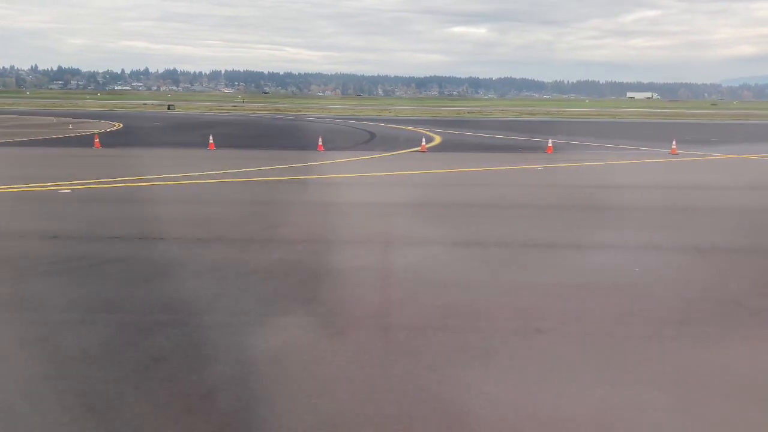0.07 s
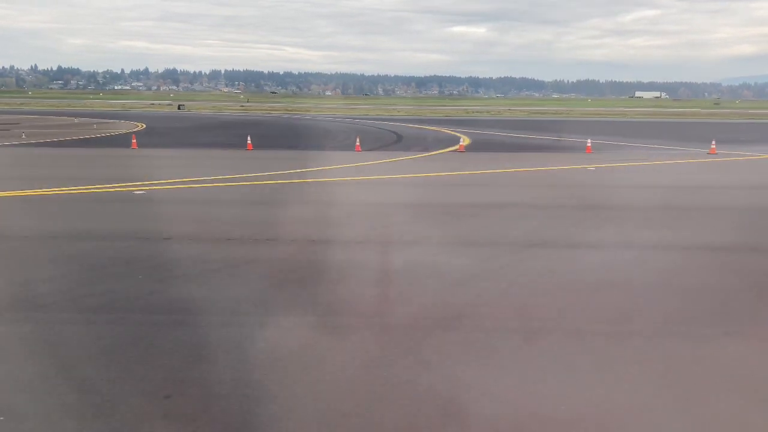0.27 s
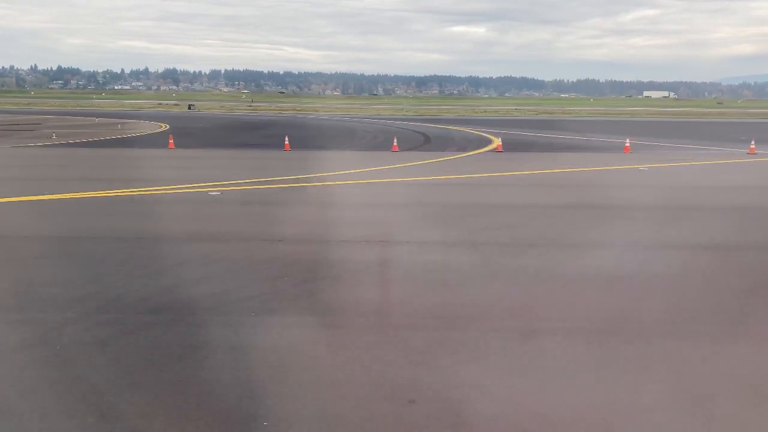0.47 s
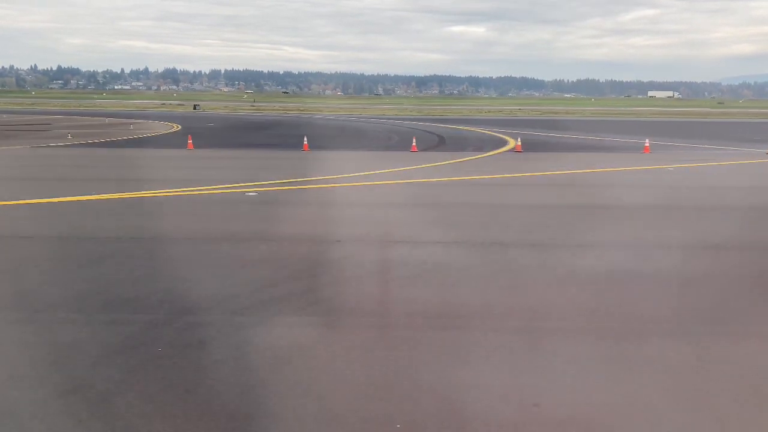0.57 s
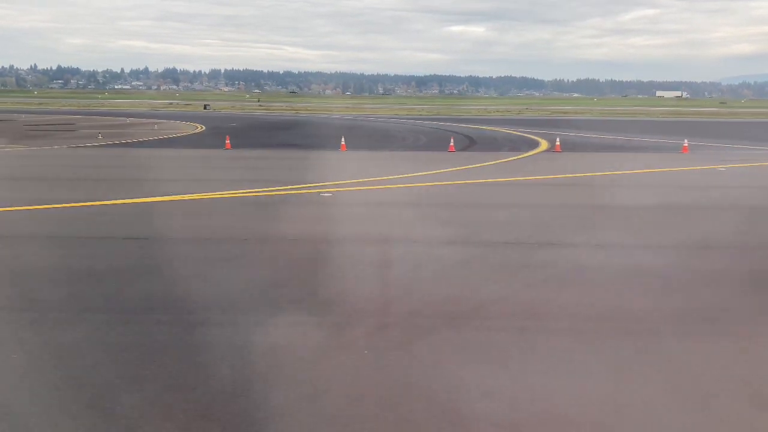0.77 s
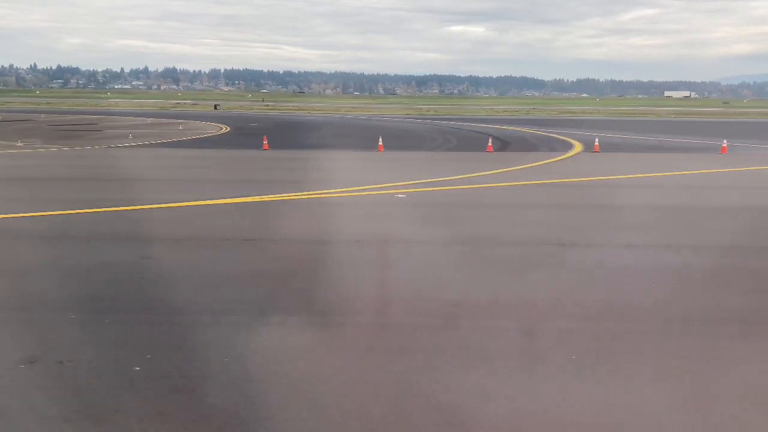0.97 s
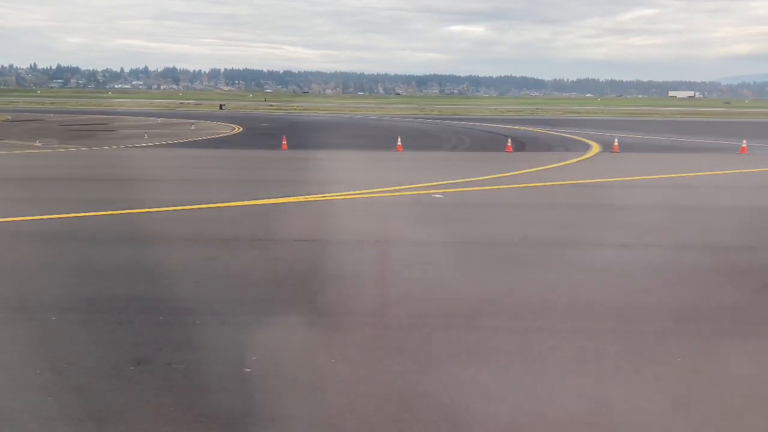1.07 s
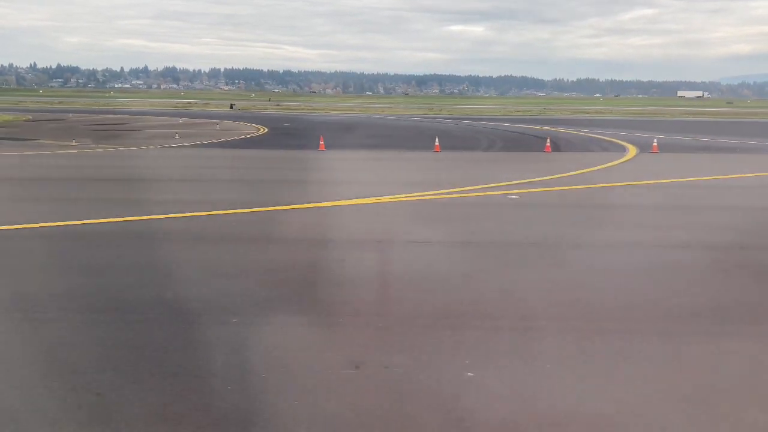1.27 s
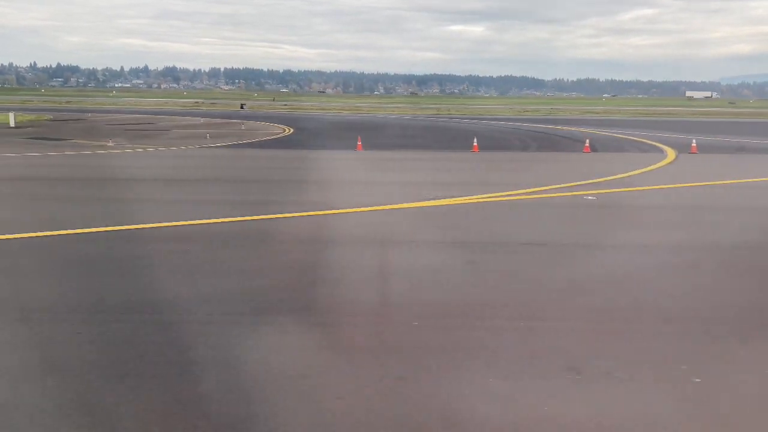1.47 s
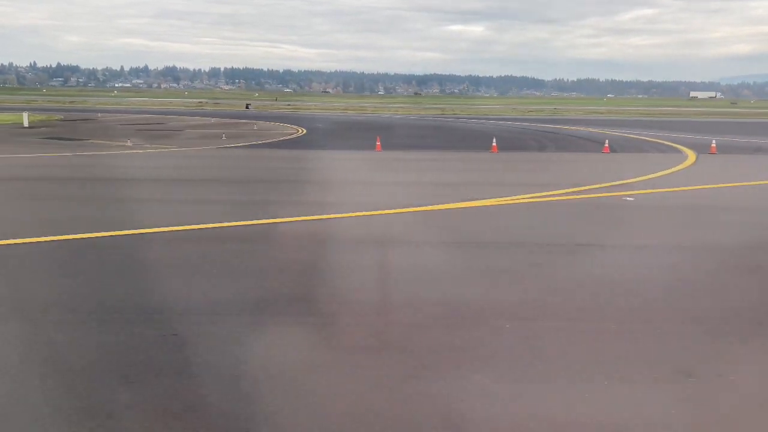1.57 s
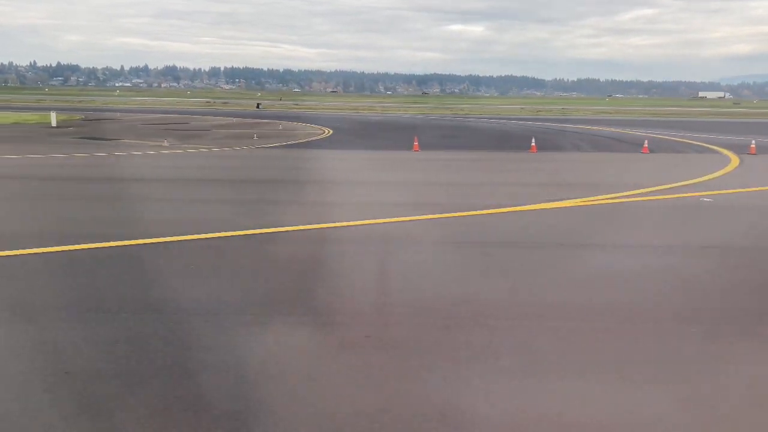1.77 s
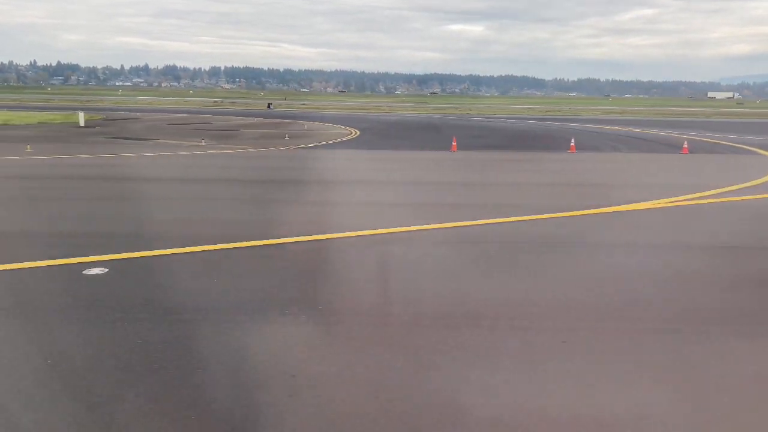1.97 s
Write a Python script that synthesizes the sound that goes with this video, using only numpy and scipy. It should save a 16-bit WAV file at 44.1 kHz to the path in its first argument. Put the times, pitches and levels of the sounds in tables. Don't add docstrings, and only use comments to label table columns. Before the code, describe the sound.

Continuous low engine hum inside a taxiing passenger plane, pulsing irregularly and strongest near the middle, with dull rumble, soft wall resonances and very faint high hiss leaning right, captured close to the window.

```python
import sys
import numpy as np
from scipy import signal
from scipy.fft import rfft, irfft, next_fast_len
from scipy.io import wavfile
from scipy.ndimage import uniform_filter1d, minimum_filter1d

SR = 44100
rng = np.random.default_rng(int(sys.argv[2]) if len(sys.argv) > 2 else 0)


def volts(x):
    e = np.asarray(x, float) / 20
    return 10 ** e


def unload_wav(signal):
    wavfile.write(
        sys.argv[1],
        SR,
        np.round(np.clip(np.atleast_2d(signal).T, -1, 1) * 32767).astype(np.int16),
    )


N = 89346
PAD = 8192
SHAFT_HZ = 64.29


def at_hz(points, hz, **ends):
    points = np.array(points)
    return np.interp(np.log(hz), np.log(points[:, 0]), points[:, 1], **ends)


def rms_one(x):
    return x / np.sqrt(np.mean(x ** 2) + 1e-20)


def drift(rate_hz):
    hop = 40
    settle = 2000
    pole = np.exp(-2 * np.pi * rate_hz * hop / SR)
    noise = rng.standard_normal(N // hop + settle + 2)
    slow = signal.lfilter([1], [1, -2 * pole, pole * pole], noise)[settle:]
    return np.interp(np.arange(N) / hop, np.arange(len(slow)), rms_one(slow))


def coloured(spectrum, flicker_db):
    size = next_fast_len(N + PAD)
    hz = np.arange(1, size // 2 + 2) * SR / size
    gain = volts(at_hz(spectrum, hz, left=-120, right=-120))
    noise = irfft(rfft(rng.standard_normal(size)) * gain, size)[:N]
    return rms_one(noise * volts(flicker_db * drift(10.0)))


def waver(hz, rate_hz, steady):
    steady = np.clip(steady, 0, 1)
    wander = drift(rate_hz) + 1j * drift(rate_hz)
    swing = np.sqrt(steady) + np.sqrt((1 - steady) / 2) * wander
    cycles = hz * np.arange(N) / SR + rng.random()
    return rms_one(np.real(swing * np.exp(2j * np.pi * cycles)))


def ports(mid, side):
    return np.array([mid + side, mid - side])


def filtered(x, gain_at):
    size = next_fast_len(N + PAD)
    hz = np.arange(size // 2 + 1) * SR / size + .01
    return irfft(rfft(x, size) * gain_at(hz), size)[..., :N]


def from_right(x, cycles_at):
    left = filtered(x, lambda hz: np.exp(-2j * np.pi * cycles_at(hz)))
    return np.array([left, x])


def drone():
    # (shaft multiple [1], level [dB], waver rate [Hz], side level [dB])
    orders = [(1.02, -20.5, 6.4, -27), (1.15, -24.5, 6.0, -22), (2.0, -21.5, 6.7, -23.5),
              (3.0, -22, 3.83, -14.5), (3.8, -32, 6.6, -19), (4.97, -24, 3.25, -12), (5.7, -30, 12, -14),
              (5.98, -24, 5.1, -16), (6.72, -29, 11, -5)]
    total = 0
    for multiple, db, rate_hz, side_db in orders:
        hz = multiple * SHAFT_HZ
        mid = waver(hz, rate_hz, .25)
        side = volts(side_db) * waver(hz, rate_hz, 0)
        total = total + volts(db) * ports(mid, side)
    return total


def throb():
    # (time [s], frequency [Hz], level [dB])
    beats = [(0.0, 254.9, -13), (0.16, 256.3, -26), (0.21, 254.4, -13.5), (0.49, 258, -20.5),
             (0.52, 259.8, -14), (0.84, 255.6, -17), (0.9, 254.9, -36), (0.96, 256.2, -12.5),
             (1.02, 257, -10), (1.07, 255.8, -26), (1.16, 256.8, -11.5), (1.19, 254.8, -30.5),
             (1.28, 257.2, -12), (1.33, 258.1, -23.5), (1.41, 254.2, -14), (1.57, 263.1, -23.5),
             (1.72, 257.8, -11.5), (2.03, 254.2, -20.5)]
    beat_s, beat_hz, beat_db = np.transpose(beats)
    t = np.arange(N) / SR
    cycles = np.cumsum(np.interp(t, beat_s, beat_hz)) / SR
    tone = np.sqrt(2) * volts(np.interp(t, beat_s, beat_db)) * np.sin(2 * np.pi * cycles)
    side = volts(-18) * waver(4 * SHAFT_HZ, 3.0, 0) * volts(beat_db.mean())
    return ports(tone, side)


def panels():
    # (frequency [Hz], level [dB], waver rate [Hz])
    panel_tones = [(799, -46, 12.0), (1297, -55, 4.0)]
    # (frequency [Hz], level [dB], waver rate [Hz])
    duct_tones = [(643.7, -43.5, 75), (1602, -60, 35.0), (2135, -72, 23), (2277, -57, 25.0),
                  (2560, -58.5, 80), (2940, -62.5, 50), (3230, -65.5, 9.4)]
    walls = sum(volts(db) * waver(hz, rate_hz, .3) for hz, db, rate_hz in panel_tones)
    ducts = sum(volts(db) * waver(hz, rate_hz, 0) for hz, db, rate_hz in duct_tones)
    return ports(.5 * walls + ducts, walls)


def roar():
    # (frequency [Hz], density [dB per Hz])
    rumble_mid = [(22, -34), (40, -13), (75, 0), (160, -2.5), (300, 2), (440, -1.5), (540, -10.5),
                  (600, -36.5)]
    # (frequency [Hz], density [dB per Hz])
    rumble_side = [(12, -52.5), (20, -31), (64, 0), (155, -21), (192, -2.5), (222, -11), (252, -5),
                   (600, -1), (780, -29), (1320, -120)]
    # (frequency [Hz], density [dB per Hz])
    roar_mid = [(520, -10.5), (627, 0), (900, -10.5), (1000, -18.5), (1200, -21), (1400, -20.5),
                (3000, -31.5), (3900, -39.5)]
    # (frequency [Hz], density [dB per Hz])
    roar_side = [(450, -15.5), (540, -3), (815, -5.5), (1330, -15), (1650, -26), (3220, -29), (3800, -44),
                 (3900, -40.5)]
    hull = ports(volts(-20) * coloured(rumble_mid, .2), volts(-33.5) * coloured(rumble_side, .6))
    cabin = ports(volts(-31) * coloured(roar_mid, .65), volts(-31.5) * coloured(roar_side, .4))
    return hull + cabin


def grazing(hz):
    # (frequency [Hz], trail [cycles])
    trail = [(5000, 1.6), (6400, 1.8), (8600, 2.5), (10100, 3.0), (12450, 3.5), (14000, 4.0), (15700, 4.5)]
    return at_hz(trail, hz)


def whine():
    # (frequency [Hz], level [dB], waver rate [Hz], steady share [0-1])
    blade_tones = [(4017, -77, 4.0, .4), (4082, -69, 4.0, .3), (4122, -66, 7.0, .65), (4150, -76, 4.0, .4),
                   (4187, -75, 4.0, .4), (12362, -83, 5.0, .5), (14072, -83, 9.0, .2),
                   (14127, -83, 6.0, .2), (14202, -82, 8.0, .2), (14264, -77, 7.0, .4)]
    lag_s = 0.00043
    tones = [volts(db) * waver(hz, rate_hz, steady) for hz, db, rate_hz, steady in blade_tones]
    low = from_right(sum(tones[:5]), lambda hz: hz * lag_s)
    high = from_right(sum(tones[5:]), grazing)
    return volts(1) * low + high


def hiss():
    # (frequency [Hz], density [dB per Hz])
    vent_spectrum = [(5500, -27.5), (7000, -4), (8500, -2), (10000, 0.5), (12000, -3.5), (14400, -4),
                     (14700, -7.5), (16000, -15)]
    # (frequency [Hz], density [dB per Hz])
    air_spectrum = [(3700, -35), (3900, -1), (5000, -5), (6500, -5.5), (8000, -16), (9000, -30)]
    loose = volts(-12.5) * np.array([coloured(vent_spectrum, .35), coloured(vent_spectrum, .3)])
    air = volts(-57.5) * np.array([coloured(air_spectrum, .3), coloured(air_spectrum, .3)])
    vent = from_right(coloured(vent_spectrum, .6), grazing)
    return volts(-62.5) * (vent + loose) + air


def scene():
    return drone() + throb() + panels() + roar() + whine() + hiss()


def low_pass(x):
    return signal.sosfilt(signal.butter(12, 15700, fs=SR, output="sos"), x)


def record(dry):
    # (frequency [Hz], left minus right [dB])
    lean = [(60, -0.5), (110, -1), (190, 1), (340, -0.5), (610, 2.5), (1100, 1), (1960, 0), (4000, 1)]
    ceiling, limit_s = .91, .004
    halves = np.array([[1], [-1]]) / 2
    leaned = filtered(dry, lambda hz: volts(at_hz(lean, hz) * halves))
    span = int(limit_s * SR)
    peak = np.abs(leaned).max(axis=0) + 1e-9
    gain = minimum_filter1d(np.minimum(1, ceiling / peak), 2 * span + 1)
    gain = uniform_filter1d(uniform_filter1d(gain, span), span)
    return low_pass(leaned * gain)


dry = scene()
out = record(dry)
unload_wav(out)
```